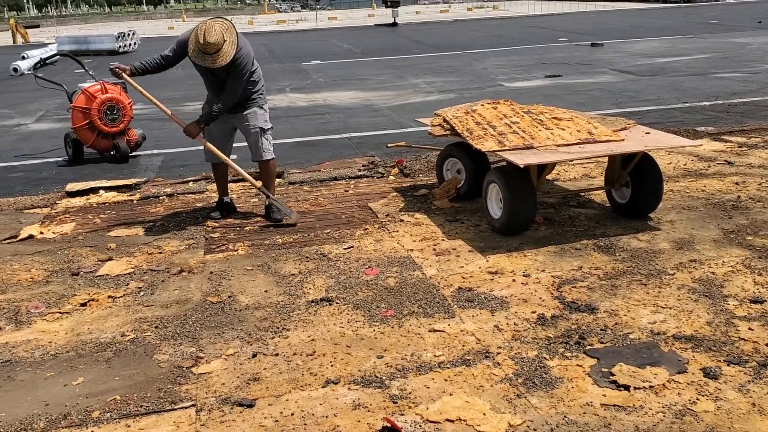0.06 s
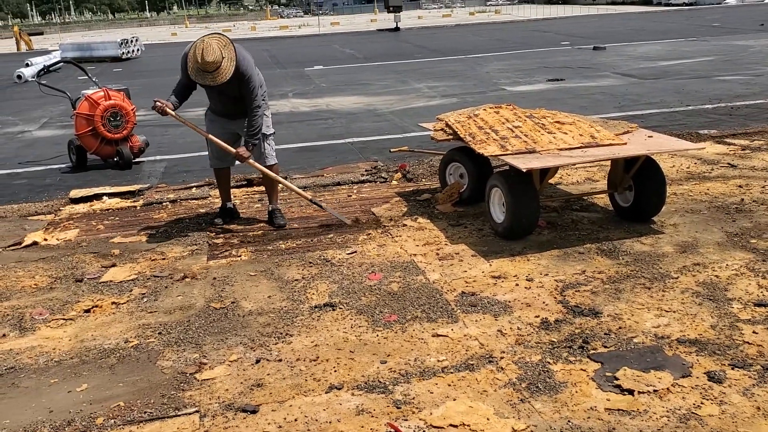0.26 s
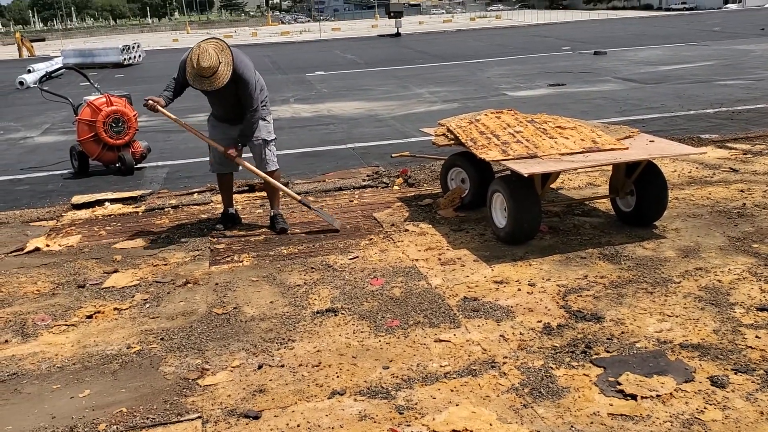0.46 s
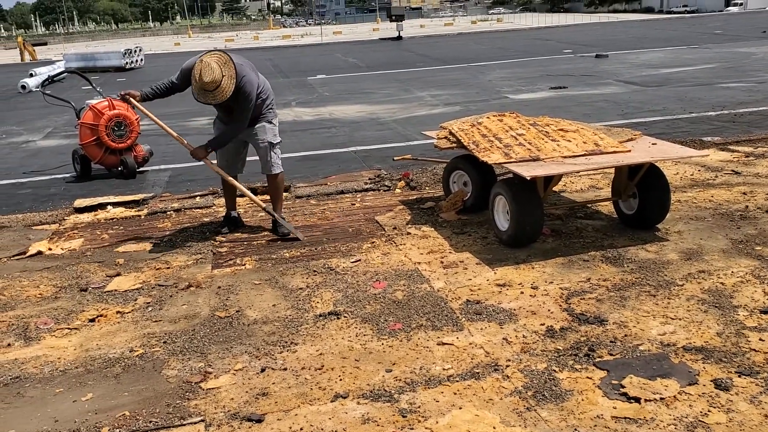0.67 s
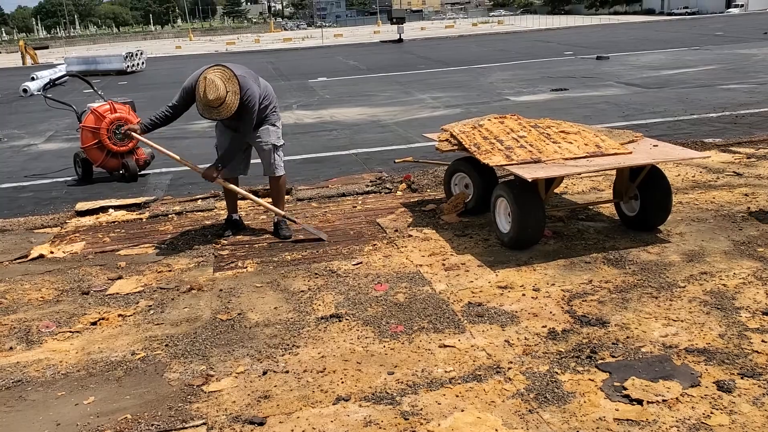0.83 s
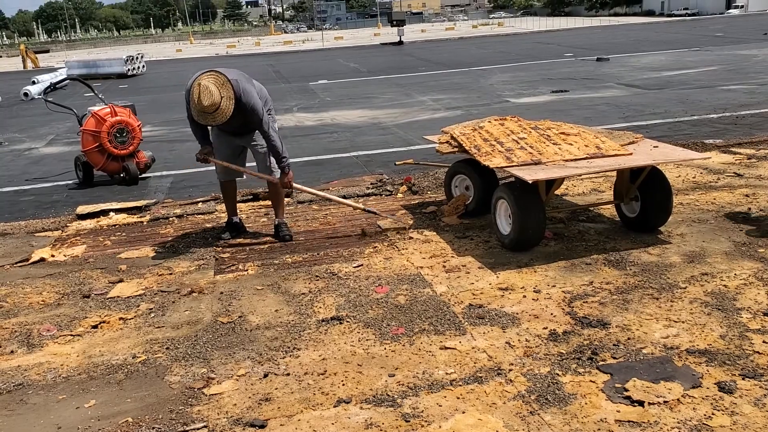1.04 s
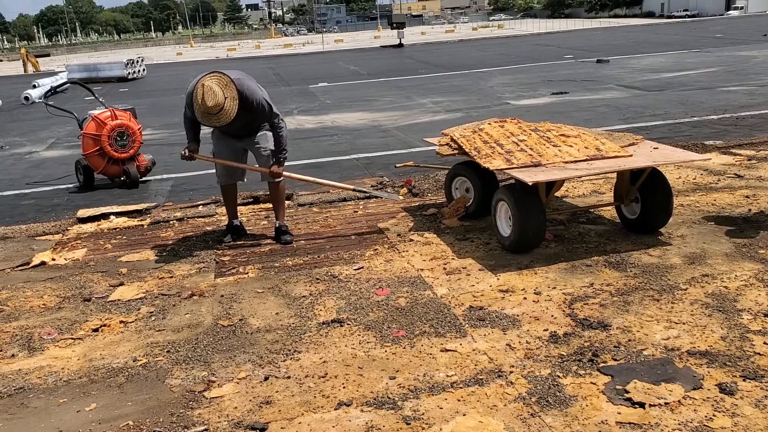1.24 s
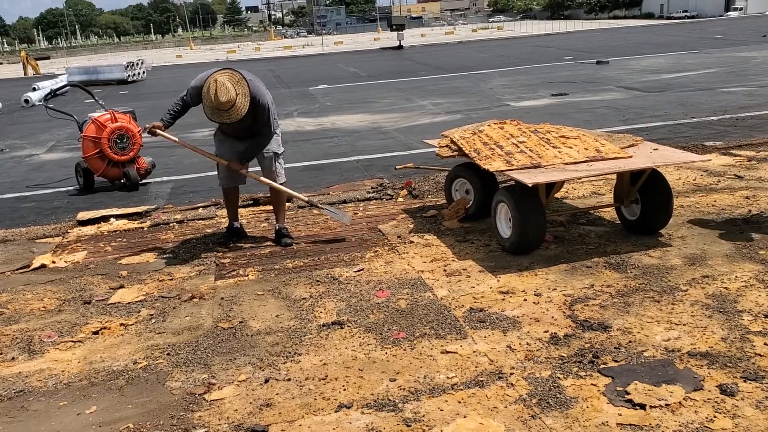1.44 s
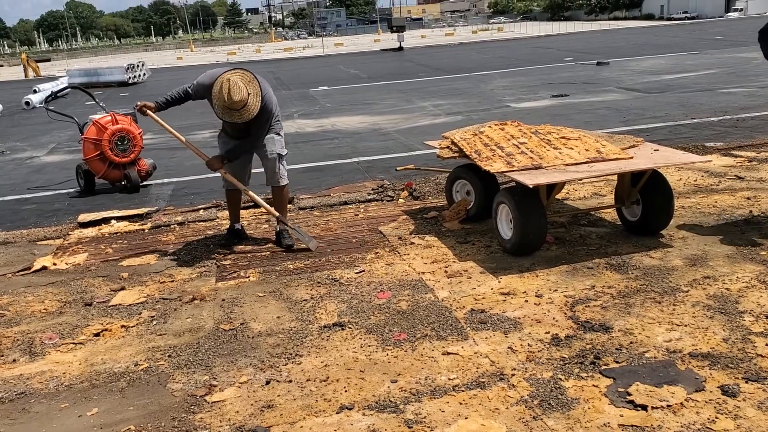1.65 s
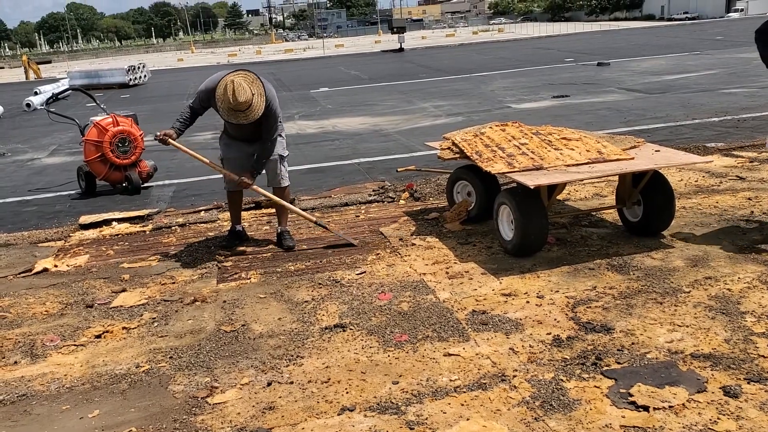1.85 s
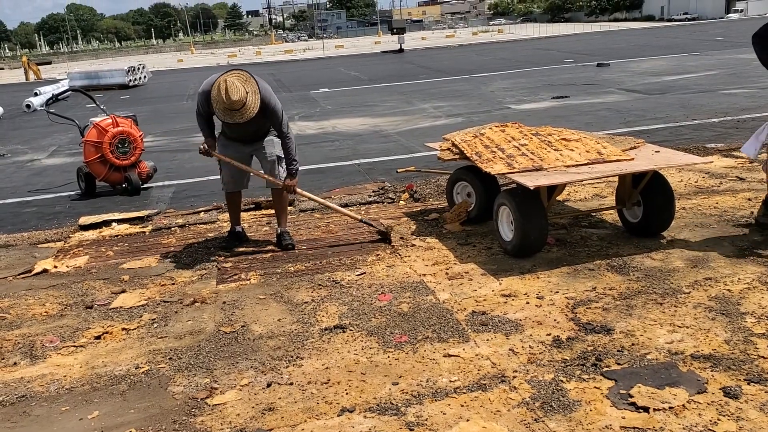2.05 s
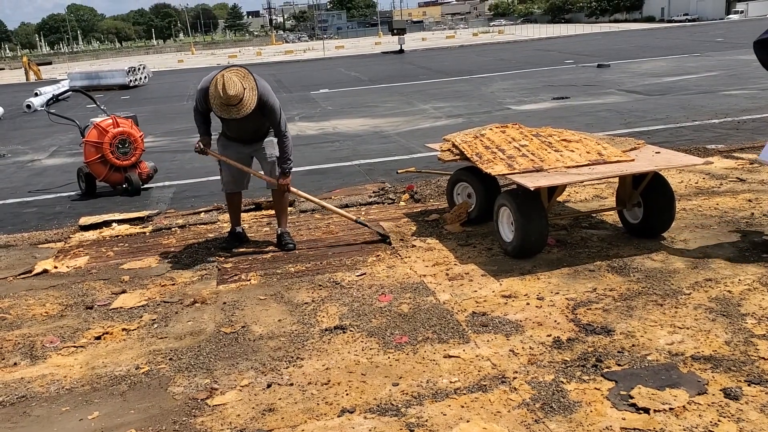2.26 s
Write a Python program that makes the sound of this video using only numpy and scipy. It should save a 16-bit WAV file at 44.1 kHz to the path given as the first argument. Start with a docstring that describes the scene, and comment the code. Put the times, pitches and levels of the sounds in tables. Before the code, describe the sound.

Steel blade scraping and ramming old roofing outdoors, with dull thuds and a low rumble.

```python
"""Scraping off a flat roof

A long-handled steel scraper tears old roofing off a roof deck, a few metres away in the open air.
The blade sticks, slips and crunches through grit, twice rams a stuck edge so that the deck booms,
and once rings free. Loose crumbs slide away between strokes. Dull thuds of the deck follow each boom
as uneven aftershocks, with softer bumps elsewhere, over a low outdoor rumble."""
import sys
import numpy as np
from scipy import signal
from scipy.fft import rfft, irfft, next_fast_len
from scipy.io import wavfile
from scipy.ndimage import map_coordinates

SR = 44100
rng = np.random.default_rng(int(sys.argv[2]) if len(sys.argv) > 2 else 0)


def store_wav(level_fs):
    """Save 16-bit WAV to argv[1]."""
    pcm = np.round(np.clip(np.atleast_2d(level_fs), -1, 1) * 32767)
    wavfile.write(sys.argv[1], SR, pcm.T.astype(np.int16))


N = 101429


def scraping():
    """Stick and slip shakes the blade and the deck while grit and gravel crack under the edge."""
    chatter, crunch = stroke_gains()
    steel = blade_chatter()
    grains = amp(-0.5) * grit() + amp(-9.5) * gravel()
    boards = amp(-9.5) * deck_drone()
    return chatter * (steel + boards) + crunch * grains


# envelopes of the five strokes: time_s, chatter_db, crunch_db
JAB = [(.2068, -21, -46), (.209, -16.5, -39), (.213, -14, -20.5), (.219, -14, -26), (.227, -21, -22.5),
       (.235, -31, -36), (.265, -59, -63)]
NUDGE = [(.44, -82, -72), (.505, -63, -73), (0.521, -48.5, -53), (.56, -65, -84)]
SHORT_PUSH = [(0.751, -60, -60), (0.807, -37, -44), (0.83, -53, -46.5), (0.838, -35, -51),
              (0.85, -55, -54.5), (0.885, -22.5, -31), (0.904, -18.5, -26.5), (0.915, -21.5, -29),
              (0.929, -24.5, -27.5)]
DRAG_BACK = [(1.289, -70, -61), (1.303, -58, -39), (1.329, -49, -34.5), (1.368, -52, -46.5),
             (1.392, -48, -35.5), (1.43, -60, -75), (1.47, -55, -56), (1.51, -69, -66)]
LONG_PUSH = [(1.521, -74, -60), (1.564, -73, -46.5), (1.655, -62.5, -38.5), (1.672, -36, -37),
             (1.70, -47, -36.5), (1.79, -37.5, -40), (1.836, -30.5, -36), (1.93, -34, -36),
             (2.04, -38.5, -38), (2.10, -41.5, -41), (2.165, -58, -45), (2.262, -57, -49),
             (2.3, -37.5, -41)]

def stroke_gains(release_s=0.018, judder_db=1.47, judder_per_s=90.8):
    """Juddering gains of chatter and crunch; both die quickly when the blade stops."""
    t, gains = np.arange(N) / SR, np.zeros((2, N))
    for stroke in (JAB, NUDGE, SHORT_PUSH, DRAG_BACK, LONG_PUSH):
        times, *levels = np.transpose(stroke)
        gate = (t >= times[0]) * np.exp(-since(times[-1]) / release_s)
        gains += gate * amp([np.interp(t, times, db) for db in levels])
    return gains * amp(judder_db * wobble(judder_per_s))


# resonances of the blade pressed on the roof: pitch_hz, width_hz, level_db
BLADE_MODES = [(727, 160, -23.5), (1008, 160, -8.5), (1220, 98, -8.5), (1715, 121, -3.5), (1980, 130, 3.5),
               (2119, 77, 0.5), (3346, 200, -21), (3703, 45, -10.5), (4245, 400, -16), (5120, 250, -20),
               (6300, 250, -17.5), (7120, 300, -17.5)]

def blade_chatter():
    """A dense run of tiny slips rings the steel."""
    slips = ticks(per_s=1500, spread_db=3)
    steel = lambda f: sum(amp(db) * resonance(f, hz, width) for hz, width, db in BLADE_MODES)
    return spread(filtered(slips, steel))


# tone of crunching grit: freq_hz, level_db
GRIT_TONE = [(200, -7), (600, -8), (1100, 4), (1450, -9), (2400, -1), (3300, 1), (4600, -2), (5600, -6),
             (7100, -7.5), (8200, -7.5), (10500, -13), (11700, -7.5), (16000, -16)]

def grit(ring_db=-4):
    """Fine grains crack under the edge and ring the blade's high modes."""
    high_modes = BLADE_MODES[len(BLADE_MODES) // 2:]
    peaks = lambda f: sum(np.abs(resonance(f, hz, width)) for hz, width, _ in high_modes)
    grains = ticks(per_s=4000, spread_db=1.5)
    return spread(filtered(grains, lambda f: amp(along(GRIT_TONE, f)) * (1 + amp(ring_db) * peaks(f))))


# bright snap of gravel and stones: freq_hz, level_db
STONE_TONE = [(800, -9.5), (2400, -6.5), (4500, 1.5), (7000, -2.5), (9500, -5), (12000, -7.5), (16000, -14)]
STONE_ATTACK_S, STONE_T60_S = 0.0002, 0.018

def gravel():
    """Coarser pieces crack at random, each a short burst of noise."""
    cracks = np.abs(ticks(per_s=190, spread_db=2.5)[0])
    bursts = signal.fftconvolve(cracks, struck(0, STONE_ATTACK_S, STONE_T60_S))[:N]
    return unit(bursts * noise(STONE_TONE))


# single snaps: start_s, level_db
STONE_SNAPS = [(1.300, -30.5), (1.314, -35), (1.333, -42), (1.346, -41), (1.382, -36), (1.566, -38),
               (1.641, -37), (1.671, -33), (1.772, -29.5)]

def stones():
    """Larger stones snap under the edge."""
    envelope = sum(amp(db) * struck(s, STONE_ATTACK_S, STONE_T60_S) for s, db in STONE_SNAPS)
    return envelope * noise(STONE_TONE)


# low body of the scrape: freq_hz, level_db
DRONE_TONE = [(60, 1.5), (260, -5), (600, -9.5), (1200, -53)]

def deck_drone():
    """The deck drones under the chattering blade."""
    return noise(DRONE_TONE)


# digs of the blade: start_s, peak_s, end_s, level_db
GRINDS = [(.18, .228, 0.27, -26), (1.76, 1.975, 2.18, -33)]
# growl of the boards: freq_hz, level_db
GRIND_TONE = [(90, -23), (180, 1), (270, 4), (400, -4), (600, -11), (1000, -12), (1500, -36)]

def grinding():
    """Where the blade digs in, uneven slips shake the boards."""
    slips = ticks(per_s=350, spread_db=3.5)
    return swells(GRINDS) * coloured(slips, GRIND_TONE)


# two hard rams and two light knocks: start_s, clack_db, crack_db, boom_db, ring_db
BLOWS = [(0.2384, -13, -24.5, -11, -63), (0.648, -31.5, -29, -39, -52), (0.6695, -23, -32.5, -34.5, -56),
         (0.9324, -11.5, -16.5, -16, -30.5)]
# tones of the woody clack and the sharp crack: freq_hz, level_db
CLACK_TONE = [(150, 3), (300, -3), (520, -3), (720, -7), (850, -1.5), (1020, 2.5), (1220, 0.5),
              (1430, -18.5), (1750, -3.5), (2050, 3), (2450, -15), (3500, -10.5), (5500, -25.5),
              (12000, -35.5)]
CRACK_TONE = [(1000, -27), (3500, 4), (5500, 0), (7100, 12.5), (8300, -11.5), (12000, -1.5), (16000, -18)]
# modes of the roof deck and of the free blade: pitch_hz, level_db, t60_s
DECK_MODES = [(56.1, -3.5, 0.38), (82.2, -3, 0.44), (117.2, -1, 0.17), (147, -1, 0.15), (174.2, 1.5, 0.18),
              (240, -1.5, .14), (284.4, -5.5, .18), (389.7, -16, 0.19)]
FREE_BLADE_MODES = [(1900, -3, 0.35), (2820, 2.5, 0.37), (7200, -26, 0.22)]

def blows(attack_s=0.0012):
    """The blade hits: a clack of steel on board, a crack, the blade's ring and a boom of the deck."""
    clack, crack, out = noise(CLACK_TONE), noise(CRACK_TONE), np.zeros((2, N))
    for s, clack_db, crack_db, boom_db, ring_db in BLOWS:
        out += amp(clack_db) * struck(s, attack_s, t60_s=0.094) * clack
        out += amp(crack_db) * struck(s, attack_s, t60_s=0.047) * crack
        out += amp(ring_db) * ringing(FREE_BLADE_MODES, s, attack_s=0.028, spread_db=3.0)
        out -= amp(boom_db) * ringing(DECK_MODES, s, attack_s=0.0024, spread_db=3.5)
    return out


# swells of the blade's thin note: start_s, peak_s, end_s, level_db
SING_SWELLS = [(.37, .49, 0.56, -58.5), (.64, .69, 0.73, -53), (.75, .83, 0.89, -53), (.93, .95, 1.08, -33),
               (1.085, 1.135, 1.17, -48.5)]

def singing(pitch_hz=3707, waver_rad=0.54, waver_per_s=40):
    """The blade's thin main ring comes and goes, slightly unsteady."""
    phase = 2 * np.pi * pitch_hz * np.arange(N) / SR + waver_rad * wobble(waver_per_s)
    return swells(SING_SWELLS) * unit(np.sin(phase))


# slides of debris: start_s, peak_s, end_s, level_db
SLIDES = [(.02, .17, 0.24, -50.5), (.25, .33, 0.68, -58), (.65, .69, 0.73, -49), (.93, 1.07, 1.25, -52.5)]
# dry rustle of crumbs: freq_hz, level_db
CRUMB_TONE = [(500, -9), (2000, 3.5), (4700, -2), (6700, -3.5), (9000, -6.5), (16000, -11.5)]

def debris():
    """Loosened crumbs slide and scatter over the roof."""
    crumbs = ticks(per_s=2700, spread_db=5)
    return swells(SLIDES) * coloured(crumbs, CRUMB_TONE)


# aftershocks and bumps of the deck: start_s, level_db
THUDS = [(.005, -29), (0.31, -16.5), (.355, -23.5), (0.552, -29.5), (0.647, -25), (0.964, -14.5),
         (1.06, -21.5), (1.555, -40), (1.691, -25.5), (1.718, -24.5), (2.017, -22.5), (2.194, -20)]
# dull tone of a thud: freq_hz, level_db
THUD_TONE = [(25, -28), (60, 3), (90, -1), (140, -7.5), (250, -19), (500, -24.5), (1500, -68)]

def thuds():
    """Dull low thuds of the deck: uneven aftershocks of each boom, and softer bumps elsewhere."""
    envelope = sum(amp(db) * struck(s, attack_s=0.0029, t60_s=0.17) for s, db in THUDS)
    return envelope * noise(THUD_TONE)


# decay of the reflections: freq_hz, t60_s
ROOF_DECAY = [(100, 0.67), (1000, 0.24), (4000, 0.24), (12000, 0.17)]

def roof_reflections(x):
    """A short, diffuse answer from the roof and the things on it."""
    hz, t, spectrum = signal.stft(rng.standard_normal((2, SR // 2)), SR, nperseg=256)
    decay = amp(-60 * t / along(ROOF_DECAY, hz)[:, None])
    tail = signal.istft(spectrum * decay, SR, nperseg=256)[1]
    return signal.fftconvolve(x, tail / np.linalg.norm(tail[0]), axes=1)[:, :N]


# outdoor bed: freq_hz, level_db
RUMBLE_TONE = [(20, -20), (40, -7), (62, 5), (100, -2.5), (170, -8), (280, -14.5), (500, -22.5),
               (1000, -34.5), (2000, -37), (4500, -43), (6800, -50.5), (9000, -55), (16000, -63)]

def outdoor_rumble(level_db=-36.5, sway_db=3.5):
    """A low rumble whose level sways."""
    return amp(level_db + sway_db * wobble(per_s=6.99)) * noise(RUMBLE_TONE)


# stereo width: freq_hz, left_right_correlation
CORRELATION = [(40, 0.68), (90, 0.49), (200, 0.81), (2000, 0.6), (5000, 0.5), (13000, 0.38)]

def spread(pair):
    """Two unrelated signals become a partly alike stereo pair of rms 1."""
    angle = lambda hz: np.arccos(np.clip(along(CORRELATION, hz), -1, 1)) / 2
    mid, side = filtered(pair, lambda hz: np.array([np.cos(angle(hz)), np.sin(angle(hz))]))
    return unit(np.array([mid + side, mid - side]))


# balance: freq_hz, left_minus_right_db
BALANCE = [(100, -1), (1000, -1.3), (2200, 0.1), (5000, -2), (13000, -3.5)]
# phase offset: freq_hz, left_minus_right_rad
PHASE_LEAD = [(60, -0.42), (1000, -0.09), (3450, 0.38), (4130, 4.5), (5000, 8), (7240, 2), (11500, 4.5),
              (12000, 11.5), (16100, 4.5)]

def placed(x):
    """Sound arrives left and right with differences of level and phase."""
    sides = np.array([[.5], [-.5]])
    pan = lambda hz: amp(sides * along(BALANCE, hz)) * np.exp(1j * sides * along(PHASE_LEAD, hz))
    return filtered(x, pan)


def amp(db):
    """Decibels to gain."""
    return 10 ** (np.asarray(db) / 20)


def unit(x):
    """Scaled to rms 1."""
    return x / np.sqrt(np.mean(x ** 2) + 1e-20)


def along(points, hz):
    """A curve through (freq_hz, value) points, read on a log axis."""
    freqs, values = np.transpose(points)
    return np.interp(np.log(hz + 1), np.log(freqs + 1), values)


def wobble(per_s):
    """A smooth random curve with per_s knots a second."""
    knots = rng.standard_normal(int(N * per_s / SR) + 4)
    return map_coordinates(knots, [np.arange(N) * per_s / SR])


def filtered(x, response):
    """x through a complex frequency response."""
    size = next_fast_len(N + SR // 2)
    return irfft(rfft(x, size) * response(np.fft.rfftfreq(size, 1 / SR)), size)[..., :N]


def resonance(f, hz, width):
    """A causal peak of height 1 with steep flanks."""
    return (1j * f * width / (hz * hz - f * f + 1j * f * width)) ** 2


def coloured(pair, tone):
    """Two signals shaped by a tone curve and spread to stereo at rms 1."""
    return spread(filtered(pair, lambda hz: amp(along(tone, hz))))


def noise(tone):
    """Stereo noise of rms 1 with the given tone."""
    return coloured(rng.standard_normal((2, N)), tone)


def ticks(per_s, spread_db):
    """Two trains of random impulses with scattered sizes."""
    impulses = (rng.random((2, N)) < per_s / SR) * rng.choice([-1, 1], (2, N))
    return impulses * amp(spread_db * rng.standard_normal((2, N)))


def since(s):
    """Seconds since s, zero before it."""
    return np.maximum(np.arange(N) / SR - s, 0)


def struck(s, attack_s, t60_s):
    """A quick rise at s and an exponential decay."""
    return (1 - np.exp(-since(s) / attack_s)) * amp(-60 * since(s) / t60_s)


def ringing(modes, s, attack_s, spread_db):
    """Damped modes set off at s, their levels varying from blow to blow."""
    out = np.zeros(N)
    for hz, db, t60_s in modes:
        gain = amp(db + spread_db * rng.standard_normal())
        out += gain * struck(s, attack_s, t60_s) * np.sin(2 * np.pi * hz * since(s))
    return out


def swells(rows):
    """Rounded swells: each rises from its start to its peak and falls to nothing at its end."""
    t = np.arange(N) / SR
    return sum(amp(db) * np.sin(np.pi / 2 * np.interp(t, [start, peak, end], [0, 1, 0]))
               for start, peak, end, db in rows)


def scene():
    """The work on the roof and its weak reflections, over the outdoor rumble."""
    work = placed(scraping() + stones() + grinding() + debris() + blows() + singing() + thuds())
    return work + amp(-14.5) * roof_reflections(work) + outdoor_rumble()


def record(dry):
    """A steep low-pass trims the very top of the treble."""
    cutoff_hz = 16200
    return filtered(dry, lambda hz: 1 / (1 + (hz / cutoff_hz) ** 160))


dry = scene()
out = record(dry)
store_wav(out)
```